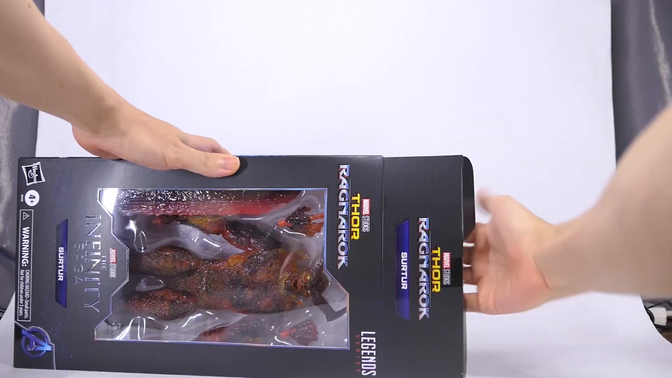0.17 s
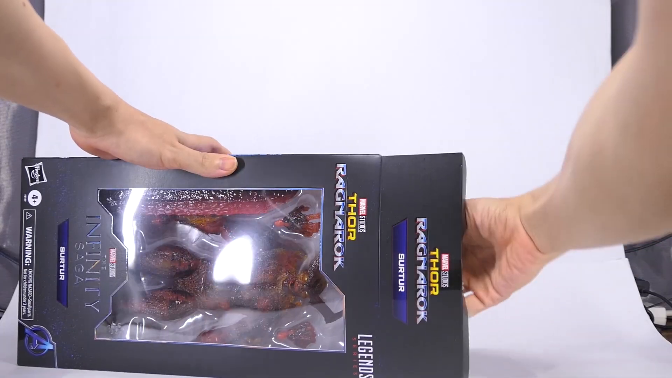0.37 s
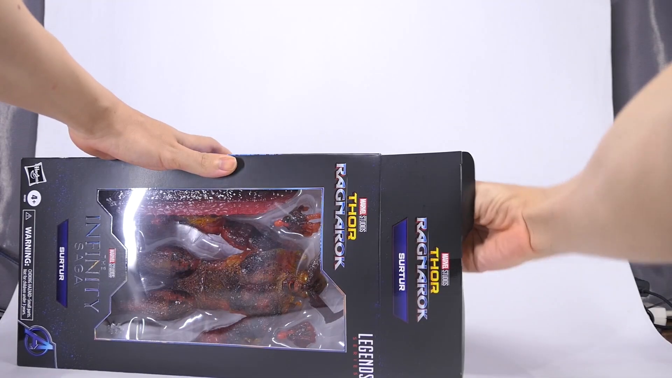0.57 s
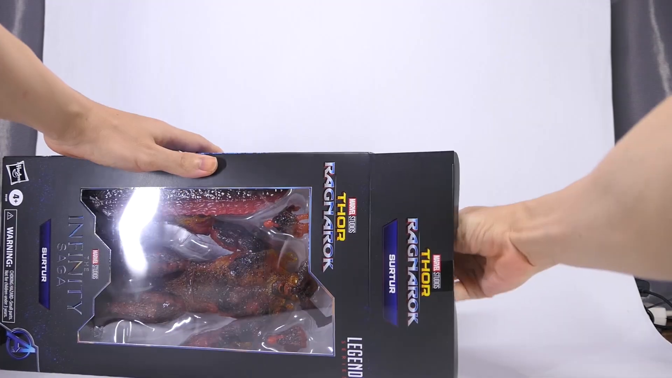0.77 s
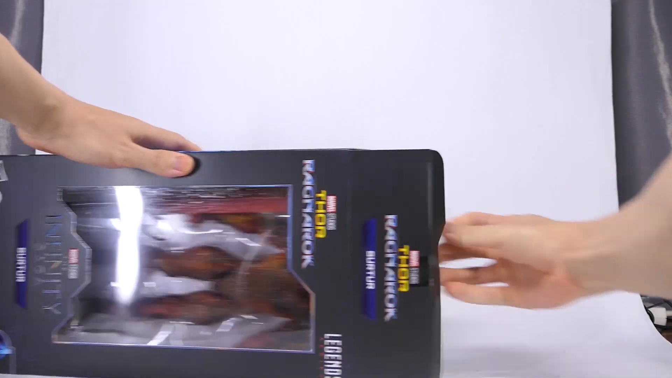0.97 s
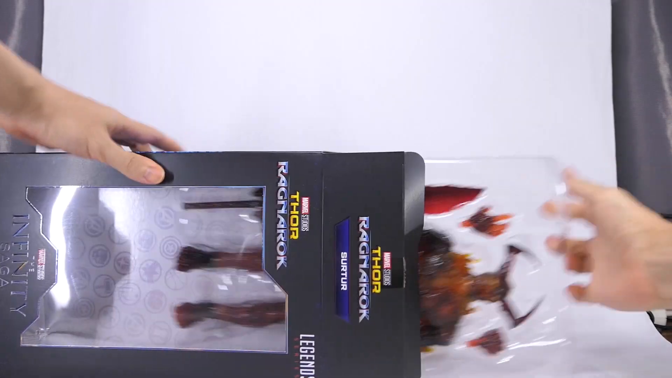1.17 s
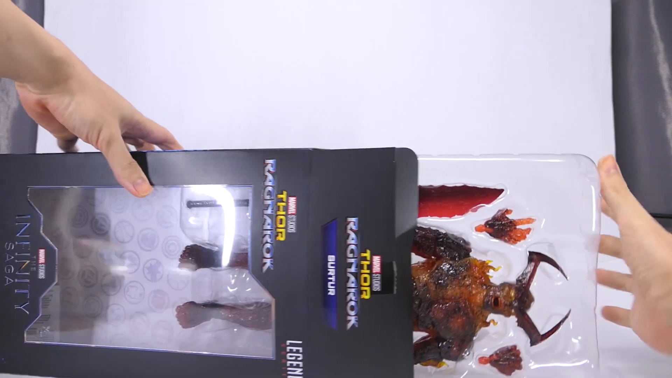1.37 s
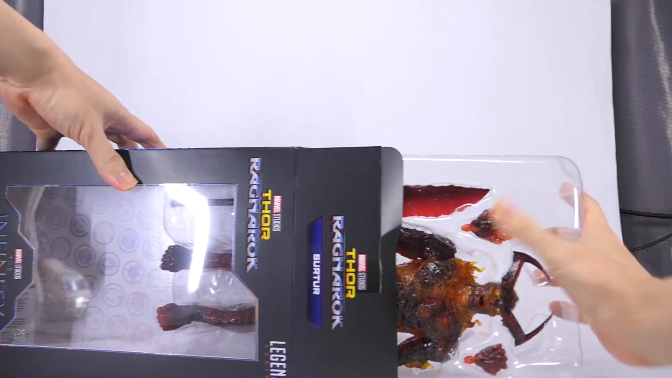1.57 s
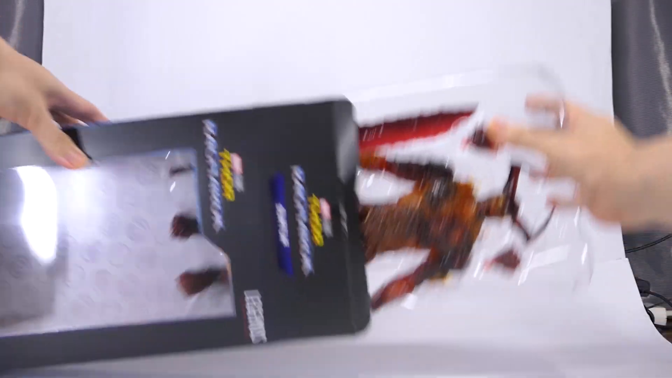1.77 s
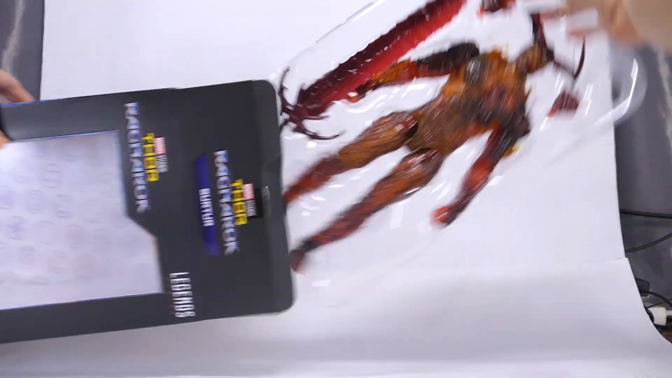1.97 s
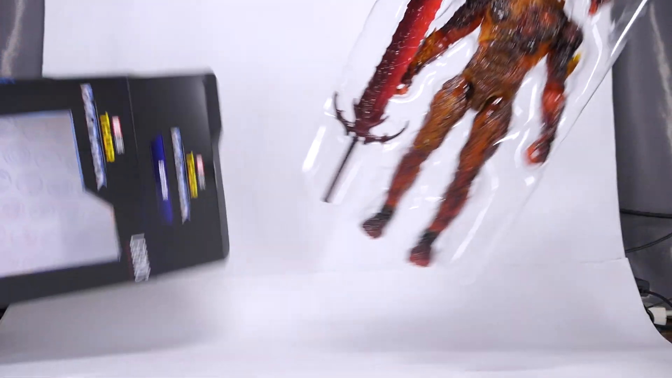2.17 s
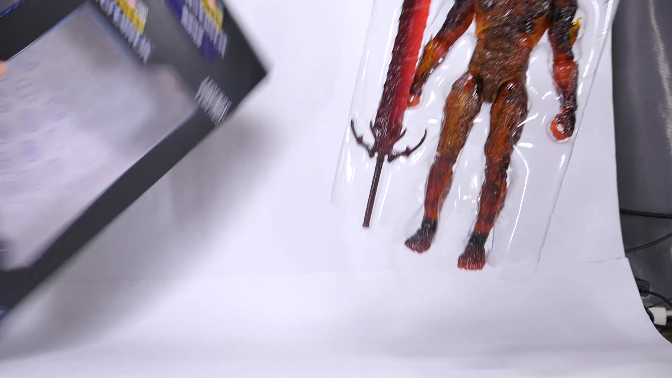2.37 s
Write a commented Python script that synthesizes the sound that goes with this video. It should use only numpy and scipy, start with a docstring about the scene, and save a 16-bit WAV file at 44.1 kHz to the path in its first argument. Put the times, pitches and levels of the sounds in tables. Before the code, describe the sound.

Plastic tray pulled from a cardboard box, with popping clicks, dry scraping and hollow thuds, close up

```python
"""Plastic tray dragged from a box

A hand reaches into a cardboard box and drags out a thin clear plastic tray, close to a stereo microphone.
The tray buckles in snaps: bursts of clicks that ring the box, the tray and its crisp sheet.
It scrapes along the cardboard (dense little grains ring the same parts) and gives a faint rising squeak.
The hollow box thuds along over a low table rumble, in a small quiet room with faint air noise."""
import sys
import numpy as np
from scipy import signal
from scipy.fft import rfft, irfft
from scipy.io import wavfile
from scipy.ndimage import uniform_filter1d

SR = 44100
rng = np.random.default_rng(int(sys.argv[2]) if len(sys.argv) > 2 else 0)


def wav_record(signal):
    """Record a signal, one row per channel, as 16-bit PCM in the file named by sys.argv[1]."""
    frames = np.transpose(np.atleast_2d(signal))
    bounded = np.clip(frames, -1, 1)
    # unit amplitude maps onto the largest positive 16-bit level
    quanta = np.round(bounded * 32767).astype(np.int16)
    wavfile.write(sys.argv[1], SR, quanta)


N = 108045  # length in samples

# Snaps of the tray and knocks. Each row: start in seconds, then levels in dB of the box thud, tray body,
# upper tray and crisp sheet, then the favoured pitch of the box in Hz and of the tray body in Hz,
# then rise and decay of the click burst in seconds.
SNAPS = [(0.006, -37.5, -45, -67, -62, 277, 705, 0.00067, 0.0086),
         (0.098, -61, -47, -49, -65, 250, 1720, 0.0012, 0.0065),
         (0.132, -39.5, -43.5, -54, -61, 338, 1270, 0.0032, 0.0055),
         (0.217, -27.5, -29.5, -42, -46.5, 485, 940, 0.00042, 0.001),
         (0.25, -57, -38, -46, -58, 300, 1760, 0.00097, 0.0032),
         (0.269, -33.5, -44, -38.5, -59, 275, 870, 0.0019, 0.002),
         (0.33, -33, -32, -33.5, -54, 505, 1930, 0.0011, 0.0074),
         (0.353, -24, -30, -63, -57, 316, 760, 0.00094, 0.0047),
         (0.427, -31.5, -36.5, -47, -68, 290, 685, 0.00068, 0.0056),
         (0.562, -26, -37, -35, -60, 192, 800, 0.0051, 0.0078),
         (0.697, -42.5, -48.5, -43.5, -56, 352, 1820, 0.00097, 0.0033),
         (0.737, -25, -24.5, -33.5, -42.5, 422, 1190, 0.00031, 0.0017),
         (0.765, -41, -38.5, -44.5, -57, 380, 890, 0.0017, 0.0023),
         (0.8, -38.5, -68, -72, -76, 247, 660, 0.0021, 0.0056),
         (0.854, -23.5, -16, -25.5, -41, 330, 670, 0.00051, 0.005),
         (0.9353, -26, -16, -17, -27, 326, 1130, 0.00034, 0.0014),
         (1.01, -25.5, -36.5, -47, -47.5, 272, 700, 0.004, 0.004),
         (1.08, -34, -17, -42, -37, 416, 725, 0.0019, 0.0036),
         (1.0832, -39.5, -22.5, -19, -23.5, 416, 740, 0.000099, 0.001),
         (1.136, -41, -26, -33.5, -66, 500, 1080, 0.00018, 0.001),
         (1.157, -43, -42, -52, -47, 380, 1420, 0.0021, 0.0046),
         (1.168, -29, -24, -59, -55, 403, 1420, 0.0034, 0.0034),
         (1.176, -22, -25.5, -52, -49, 443, 1380, 0.00017, 0.0013),
         (1.199, -29.5, -25, -36.5, -41, 310, 1020, 0.0014, 0.0048),
         (1.215, -26.5, -27.5, -56, -56, 507, 895, 0.0011, 0.0055),
         (1.241, -26, -21.5, -35, -38.5, 375, 1320, 0.0012, 0.005),
         (1.252, -24.5, -30, -59, -49, 373, 1350, 0.00071, 0.00092),
         (1.268, -28.5, -13.5, -22, -37.5, 290, 1320, 0.00013, 0.0026),
         (1.283, -28, -31, -57, -48, 343, 880, 0.0019, 0.0038),
         (1.346, -39, -45, -64, -57, 364, 1140, 0.0006, 0.0028),
         (1.368, -37.5, -36, -51, -58, 530, 1300, 0.00072, 0.016),
         (1.402, -68, -50, -51, -56, 370, 1180, 0.0016, 0.0025),
         (1.496, -41.5, -38.5, -41, -53, 247, 1380, 0.0016, 0.003),
         (1.522, -42.5, -39.5, -76, -60, 403, 895, 0.00082, 0.0022),
         (1.607, -42.5, -33.5, -46, -52, 380, 1190, 0.0015, 0.014),
         (1.691, -36.5, -31.5, -57, -21, 466, 1060, 0.00012, 0.001),
         (1.693, -56, -48, -33.5, -30, 500, 1240, 0.00018, 0.0017),
         (1.703, -39, -28.5, -50, -32.5, 446, 1040, 0.00067, 0.0043),
         (1.73, -33, -36, -31, -36, 410, 960, 0.0017, 0.0019),
         (1.742, -41, -27, -32, -27, 303, 1600, 0.0016, 0.0014),
         (1.746, -30.5, -26.5, -26.5, -31.5, 287, 1080, 0.0039, 0.00099),
         (1.806, -40, -35, -43.5, -62, 400, 1040, 0.0024, 0.0031),
         (1.865, -29, -35.5, -43.5, -42.5, 304, 800, 0.0019, 0.0054),
         (1.965, -37, -27, -42, -53, 306, 1370, 0.0041, 0.0041),
         (1.971, -27.5, -36, -45, -45, 234, 790, 0.002, 0.0047),
         (2.013, -32, -34, -30, -32, 480, 720, 0.00021, 0.0043),
         (2.026, -40, -32, -31, -27.5, 486, 910, 0.0013, 0.0024),
         (2.045, -33, -27.5, -29, -30, 540, 1370, 0.0017, 0.002),
         (2.069, -22.5, -23.5, -26.5, -41, 293, 1270, 0.0003, 0.0015),
         (2.094, -22.5, -30, -27, -38, 370, 900, 0.0012, 0.0015),
         (2.123, -46, -40, -45, -31, 302, 1270, 0.0022, 0.0054),
         (2.138, -23.5, -21.5, -31.5, -39, 313, 1100, 0.0023, 0.0043),
         (2.148, -35, -36, -56, -38, 322, 1070, 0.001, 0.0012),
         (2.157, -39, -41, -58, -50, 278, 710, 0.00087, 0.0021),
         (2.178, -34, -33.5, -46, -44.5, 200, 745, 0.0011, 0.0031),
         (2.2, -31, -49, -55, -66, 149, 800, 0.0024, 0.0017),
         (2.236, -36.5, -52, -68, -76, 186, 700, 0.0035, 0.0022),
         (2.279, -38, -38, -52, -66, 497, 650, 0.00012, 0.0014),
         (2.288, -33.5, -42.5, -40.5, -39, 344, 2054, 0.0015, 0.0015),
         (2.347, -63, -45, -50, -58, 310, 1810, 0.00027, 0.0023),
         (2.392, -43, -46.5, -64, -52.5, 297, 1200, 0.0014, 0.0031)]
# Scraping of tray and hand on cardboard. Each row: time in seconds, then levels in dB of the box,
# tray body, upper tray and crisp sheet.
SCRAPE = [(0,-30,-38,-45.5,-58),(.032,-49.5,-52,-53.5,-54),(.072,-61,-58,-62,-64),(.112,-53,-50,-56,-56.5),(.162,-42.5,-45,-55,-63),(.202,-53,-62,-60,-70),(.242,-36.5,-43.5,-50,-59),(.302,-45,-36.5,-46.5,-53),(.382,-54,-42,-46.5,-60.5),(.412,-41.5,-53,-57.5,-66),(.472,-51.5,-46,-51.5,-64),(.532,-37,-36.5,-45,-56),(.577,-33.5,-40,-36.5,-50),(.612,-49,-40,-40.5,-53),(.632,-47,-56,-64,-68),(.672,-50.5,-54.5,-54,-69),(.712,-37,-43,-46,-56),(.782,-46,-54,-59,-60),(.832,-34,-38,-55,-60),(.902,-43,-47,-63,-65),(.992,-52,-45.5,-49,-55.5),(1.052,-40.5,-37,-48,-51.5),(1.122,-40.5,-43.5,-46.5,-58),(1.192,-41.5,-31.5,-48,-52.5),(1.302,-37,-38.5,-52,-55),(1.332,-55,-43,-55.5,-66),(1.442,-50,-50.5,-58,-58.5),(1.562,-55.5,-51,-55,-56.5),(1.672,-49.5,-48,-53,-54.5),(1.717,-45,-33.5,-35.5,-39.5),(1.772,-42,-43,-49,-56),(1.842,-44.5,-45,-51,-52),(1.922,-39,-41,-50,-48),(2.002,-37,-37,-45,-48),(2.037,-29,-26,-34,-28),(2.062,-33.5,-29,-44,-42.5),(2.102,-29,-31,-39,-38),(2.142,-27,-31,-34,-46),(2.172,-27.5,-35.5,-43,-45.5),(2.202,-40,-47,-52.5,-62),(2.262,-51.5,-61,-64,-69),(2.332,-66,-53,-60,-70),(2.45,-58,-60,-70,-68)]
# Clear ringing tones (modes) of the box. Each row: pitch in Hz, relative level in dB,
# time to die away by 60 dB in seconds.
BOX_MODES = [(149.3, -10, 0.081), (204, -4, 0.15), (266.4, -0.5, 0.1), (319.3, -0.5, 0.087),
             (364.8, -3.5, 0.089), (504, -3.5, 0.074), (569.2, -0.5, 0.05)]
# Clear modes of the tray. Each row: pitch in Hz, relative level in dB, time to die by 60 dB in seconds.
TRAY_MODES = [(681, -0.5, 0.04), (737, 3, 0.041), (882, -0.5, 0.034), (1040, -2, 0.031), (1393, 1, 0.024),
              (1465, -1.5, 0.024), (1705, 3, 0.036), (1918, 2, 0.023), (2410, -3, 0.045),
              (2762, -0.5, 0.039), (3054, -3, 0.025), (3293, -4.5, 0.044), (3624, 0, 0.018),
              (7220, 1.5, 0.013), (9530, -0.5, 0.015)]
# The four ringing parts: box, tray body, upper tray, crisp sheet. Each row: lowest and highest pitch in Hz,
# level of the crowd of close modes against the clear ones in dB, time for that crowd to die by 60 dB
# in seconds, scatter of the scrape grains in dB, side (stereo difference) level in dB.
PARTS = [(146, 597, -2.5, 0.033, 0, -14), (562.9, 1966, 3.5, 0.045, 4, -12.5),
         (2210, 5580, 1, 0.045, 0.5, -9), (5830, 13050, 9, 0.039, 1.5, -9.5)]
# Tone colour of the room air. Each row: frequency in Hz, relative level per Hz in dB.
AIR_COLOUR = [(25, -18), (317, 10), (439, 0), (754, 4), (4250, -31), (5730, -25), (14000, -27),
              (16000, -43)]
# The table's low rumble. Each row: time in seconds, level in dB.
RUMBLE = [(0.0, -49), (0.05, -55.5), (1.01, -65.5), (1.58, -69), (1.73, -56), (1.84, -69), (2.22, -50),
          (2.3, -73), (2.45, -66)]
# The tray moves across the microphones. Each row: time in seconds, left minus right in dB.
PAN = [(0, 0), (1.3, -1), (1.7, -1), (2.0, .4)]
# A faint rising rub tone. One row: start and end in seconds, first and last pitch in Hz,
# width of its wobble in Hz, peak level before the wobble in dB.
SQUEAK = (1.55, 1.625, 1230, 1480, 60, -46)

AIR_DB = -49.5
ROOM_DB, ROOM_T60_S = -20.5, 0.093
BODY_LOW_HZ, TOP_HZ = 135, 16000  # bass limit of the near sounds, treble limit of the recorder
# Random spread of the clear modes: level in dB, pitch as a fraction
MODE_SCATTER_DB, MODE_JITTER = 2.5, 0.019
FAVOUR_DB_OCT = 19.5  # loss per octave away from the favoured pitch
SHEET_DULL, SCRAPE_DULL = .9, 0.61  # treble loss of the sheet, 0 is none: hardest snap, scrape
GRAINS_PER_S, GRAIN_T60_S = 4000, 0.035
STEADY_S = 0.04  # time over which the grains' strength is evened out
BURST_SCATTER_DB, FIRST_CLICK_DB = 4.5, 14  # the first click is then scaled by hardness
CRACK_DB, CRACK_T60_S = 2.5, 0.0028  # quick start on top of the crowd's decay
HARD_RISE_S, HARD_CLEAR_DB = 0.00066, 7  # rise time scale of hardness, boost of clear modes when fully hard


def amp(db):
    """Turn decibels into a plain multiplier."""
    return 10 ** (np.asarray(db) / 20)


def unit(x):
    """Scale a sound to an average (RMS) strength of one."""
    return x / np.sqrt(np.mean(x ** 2) + 1e-18)


def band(x, lo_hz, hi_hz):
    """Keep mainly the sound between two frequencies."""
    edges = [lo_hz, min(hi_hz, .45 * SR)]
    return signal.sosfilt(signal.butter(2, edges, "bandpass", fs=SR, output="sos"), x)


def fade(t, t60):
    """A natural decay that falls 60 dB in t60 seconds."""
    return np.exp(-np.log(1000) * t / t60)


def curve(table, column):
    """Draw straight lines between a table's points, one value per sample."""
    table = np.array(table)
    return np.interp(np.arange(N) / SR, table[:, 0], table[:, column])


def stereo(mid, side, side_db):
    """Add the side sound on the left and subtract it on the right, for width."""
    return np.array([mid + amp(side_db) * side, mid - amp(side_db) * side])


def background():
    """Faint room air is coloured noise; the table's rumble under the moving box is low noise."""
    freqs, table = np.fft.rfftfreq(N, 1 / SR), np.array(AIR_COLOUR)
    colour = amp(np.interp(np.log(freqs + 1), np.log(table[:, 0]), table[:, 1]))
    air = unit(irfft(rfft(rng.standard_normal((2, N))) * colour, N))
    mid, side = (unit(band(band(rng.standard_normal(N), 69, 198), 69, 198)) for _ in range(2))
    rumble = amp(curve(RUMBLE, 1)) * stereo(mid, side, -0.5)
    return amp(AIR_DB) * air + rumble


def room_echo(near):
    """Small-room reflections blur the near sounds into a short fading tail of noise."""
    t = np.arange(SR // 3) / SR
    tail = rng.standard_normal((2, len(t))) * fade(t, ROOM_T60_S) * (t > .004)
    tail /= np.sqrt(np.sum(tail ** 2, axis=1, keepdims=True))
    return amp(ROOM_DB) * signal.fftconvolve(near, tail, axes=1)[:, :N]


def squeak():
    """Rubbing makes a tone that climbs in pitch, swells and dies, with an uneven loudness."""
    start, end, from_hz, to_hz, width_hz, db = SQUEAK
    along = np.clip((np.arange(N) / SR - start) / (end - start), 0, 1)
    wobble = 1 + .5 * unit(uniform_filter1d(rng.standard_normal(N), int(SR / width_hz / 2)))
    pitch_hz = from_hz + (to_hz - from_hz) * along
    tone = np.sin(2 * np.pi * np.cumsum(pitch_hz) / SR)
    return amp(db) * np.sin(np.pi * along) * wobble * tone


def dense(part, noise, dull):
    """A part's close modes crowd together and are heard as a band of noise; dulling affects only the sheet."""
    if part[1] > 10000:  # the crisp sheet
        noise = signal.lfilter([1], [1, -np.clip(dull, 0, .95)], noise)
    return amp(part[2]) * unit(band(noise, part[0], part[1]))


def clear(part, chance, favour_hz=None, size=4000):
    """A click sets off a part's clear modes as fading tones; the place of the buckle favours some of them."""
    modes = [mode for mode in BOX_MODES + TRAY_MODES if part[0] <= mode[0] < part[1]]
    modes = np.array(modes).reshape(-1, 3)
    if not len(modes):
        return np.zeros(size)
    hz, db, t60 = modes.T[:, :, None]
    t = np.arange(size) / SR
    level_luck, pitch_luck, sign_luck = chance.standard_normal((3, len(modes), 1))
    db = db + MODE_SCATTER_DB * level_luck
    if favour_hz:
        db = db - FAVOUR_DB_OCT * np.abs(np.log2(hz / favour_hz))
    tones = np.sin(2 * np.pi * hz * (1 + MODE_JITTER * pitch_luck) * t)
    return unit(np.sum(np.sign(sign_luck) * amp(db) * fade(t, t60) * tones, axis=0))


def scrape():
    """Surfaces stick and slip in dense grains of uneven size, which ring the same parts as the snaps."""
    hits = (rng.random(N) < GRAINS_PER_S / SR) * rng.standard_normal(N)
    size, out = rng.exponential(1, N), 0
    for column, part in enumerate(PARTS, start=1):
        grains = hits * amp(part[4] * size)
        # Even out the grains' running strength, so the table sets the scrape's loudness
        grains = grains / np.sqrt(uniform_filter1d(grains ** 2, int(STEADY_S * SR)) + 1e-12)
        # Each grain leaves a fading glow of energy, which shapes the crowd of modes
        glow = np.sqrt(signal.lfilter([1], [1, -fade(2 / SR, GRAIN_T60_S)], grains ** 2))
        channels = []
        for _ in range(2):
            ringing = unit(signal.fftconvolve(grains, clear(part, rng))[:N])
            crowd = dense(part, glow * rng.standard_normal(N), SCRAPE_DULL)
            channels.append(unit(ringing + crowd))
        mid, side = channels
        out = out + amp(curve(SCRAPE, column)) * stereo(mid, side, part[5])
    return out


def ring(part, chance, favour_hz, hard, size=4000):
    """A part answers a click with clear modes, a quick crack and the dying crowd of close modes."""
    t = np.arange(size) / SR
    envelope = fade(t, part[3]) + amp(CRACK_DB) * fade(t, CRACK_T60_S)
    crowd = dense(part, chance.standard_normal(size) * envelope, SHEET_DULL * hard)
    return amp(HARD_CLEAR_DB * hard) * clear(part, chance, favour_hz) + crowd


def click_burst(rise, decay, hard, chance):
    """A buckle gives way in scattered clicks that swell and die; a fast one opens with a hard click."""
    t = np.arange(1500) / SR
    clicks = amp(BURST_SCATTER_DB * chance.standard_normal(len(t))) * np.sign(chance.standard_normal(len(t)))
    clicks *= chance.random(len(t)) < 1 / 40  # about one sample in 40 holds a click
    clicks *= np.exp(-t / max(decay, 1e-4)) * (1 - np.exp(-t / max(rise, 1e-5)))
    clicks[0] = amp(FIRST_CLICK_DB) * hard
    return clicks


def snaps():
    """Each buckle is a burst of clicks that rings every part at its own strength."""
    out = np.zeros((2, N + 9000))
    seeds = rng.integers(0, 2 ** 31, len(SNAPS))
    for (at, *dbs, box_hz, tray_hz, rise, decay), seed in zip(SNAPS, seeds):
        chance = np.random.default_rng(seed)
        hard = np.exp(-rise / HARD_RISE_S)  # near 1 for a very quick buckle, near 0 for a slow one
        clicks = click_burst(rise, decay, hard, chance)
        hit = 0
        for part, db, hz in zip(PARTS, dbs, (box_hz, tray_hz, None, None)):
            mid, side = (signal.fftconvolve(clicks, ring(part, chance, hz, hard)) for _ in range(2))
            norm = np.sqrt(np.sum(mid ** 2) / (SR / 100))  # level = energy spread over 10 ms
            hit = hit + amp(db) / norm * stereo(mid, side, part[5])
        i = int(at * SR)
        out[:, i:i + hit.shape[1]] += hit
    return out[:, :N]


def scene():
    """Pan the near sounds together, thin their bass, then add the room and the background."""
    pan = curve(PAN, 1)
    near = (snaps() + scrape() + squeak()) * amp(np.array([pan, -pan]) / 2)
    # Small bodies radiate no bass
    near = signal.sosfilt(signal.butter(2, BODY_LOW_HZ, "highpass", fs=SR, output="sos"), near)
    return near + room_echo(near) + background()


def record(dry):
    """The recorder rounds the loudest peaks and cuts the top treble."""
    rounded = dry / (1 + (np.abs(dry) / .95) ** 10) ** (1 / 10)
    return signal.sosfilt(signal.ellip(10, .2, 80, TOP_HZ, fs=SR, output="sos"), rounded)


dry = scene()
out = record(dry)
wav_record(out)
```